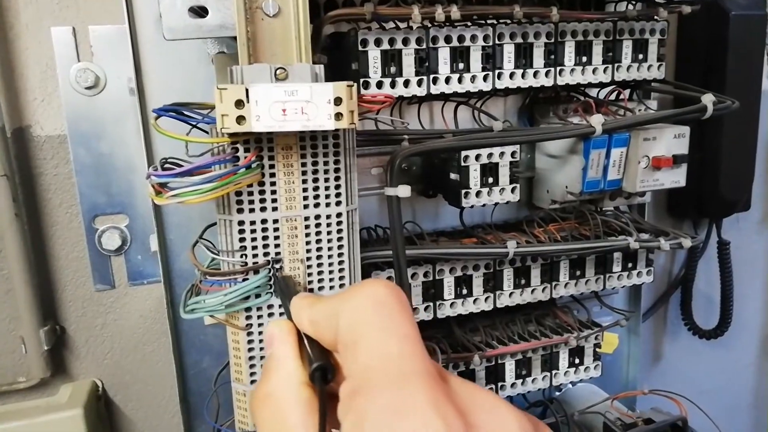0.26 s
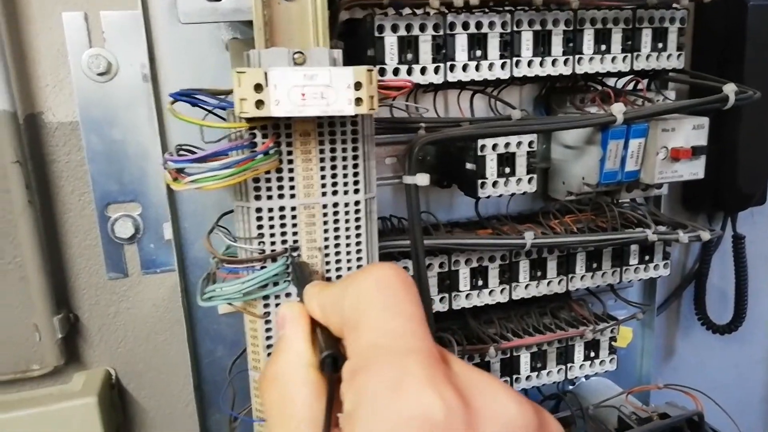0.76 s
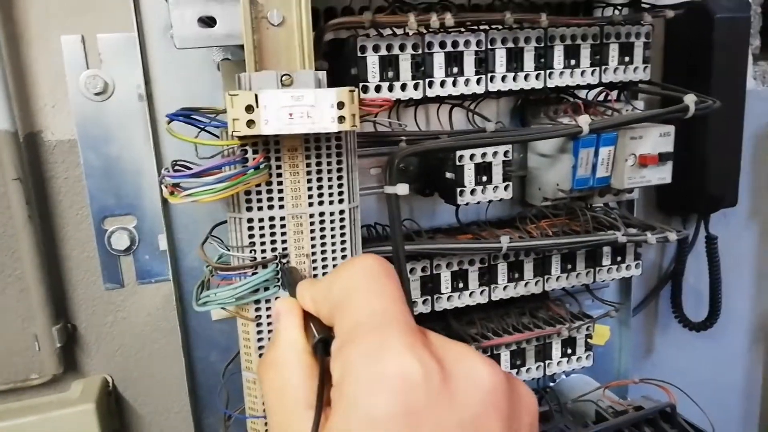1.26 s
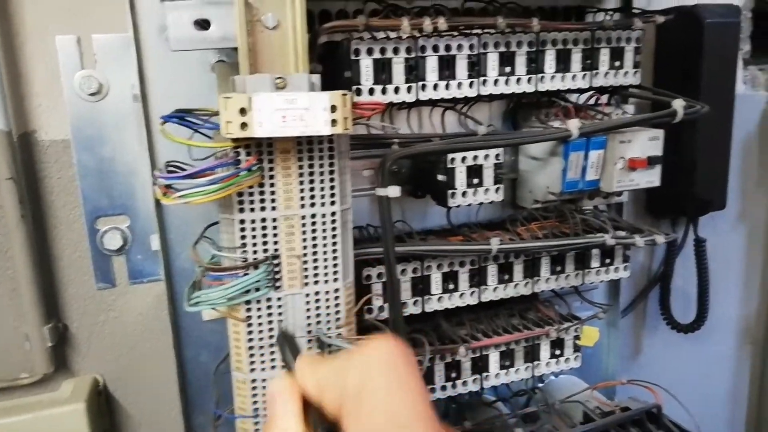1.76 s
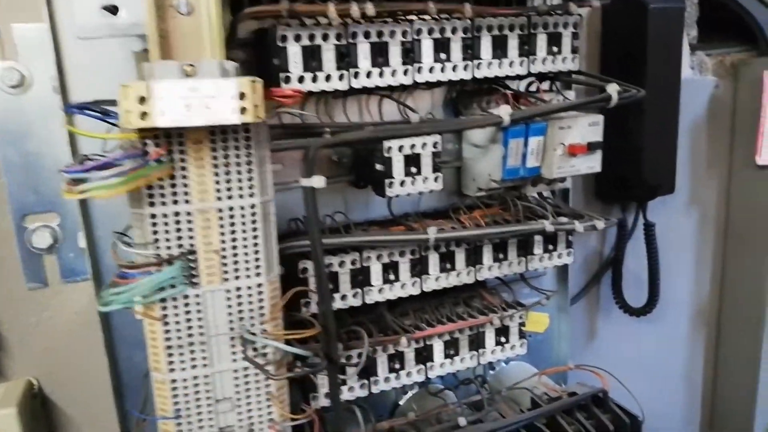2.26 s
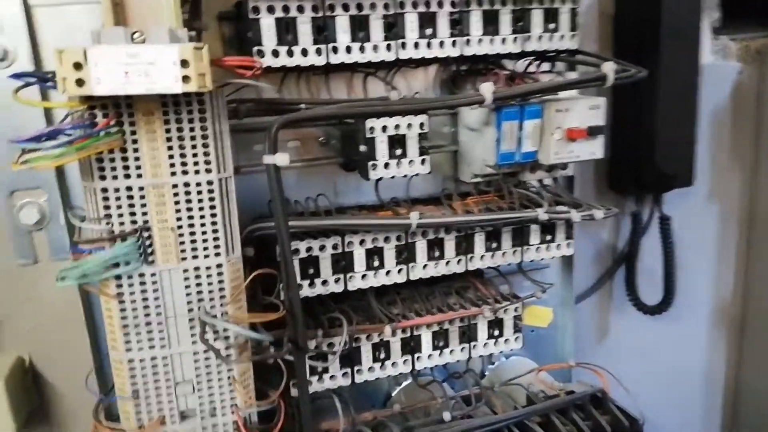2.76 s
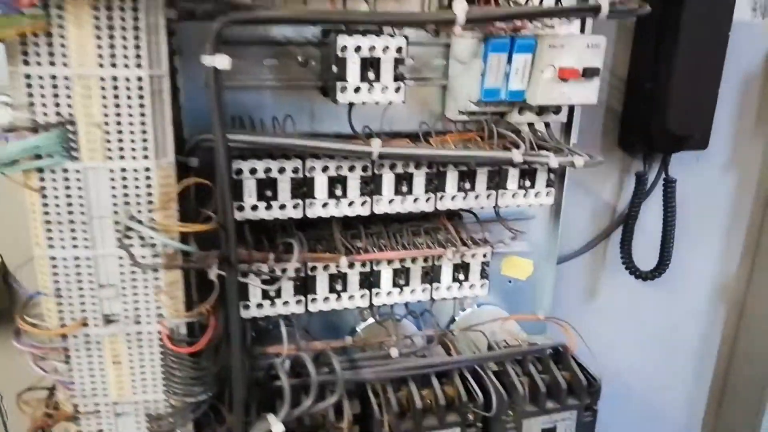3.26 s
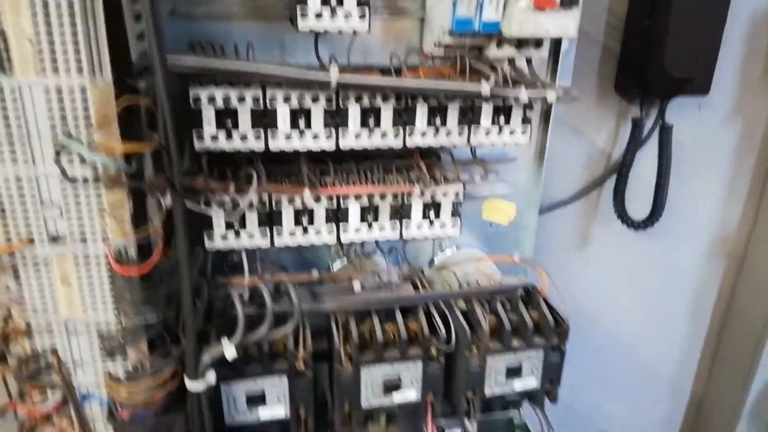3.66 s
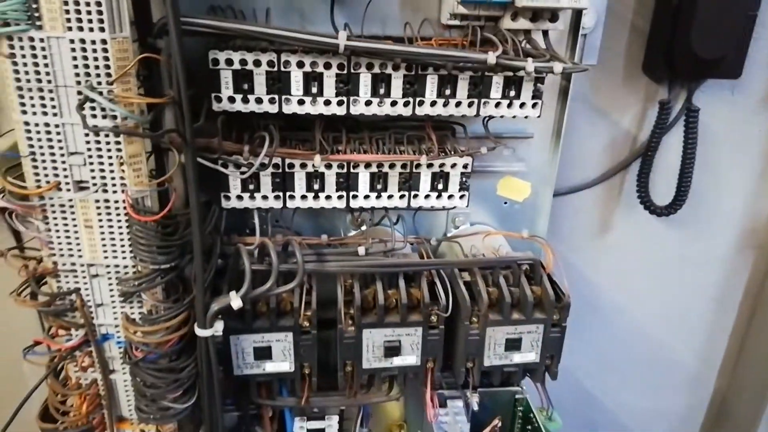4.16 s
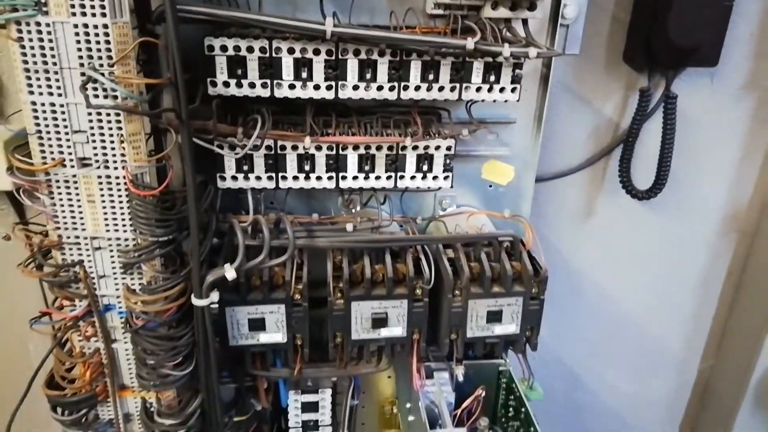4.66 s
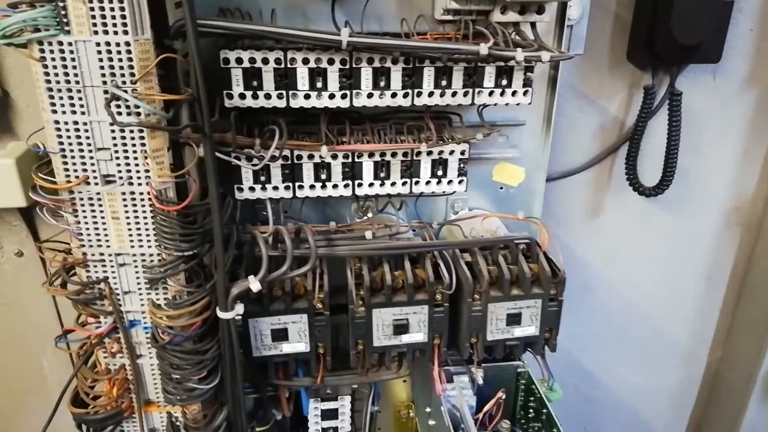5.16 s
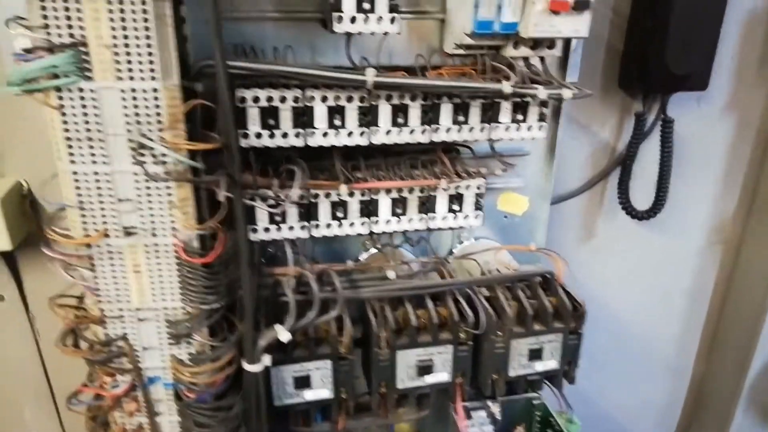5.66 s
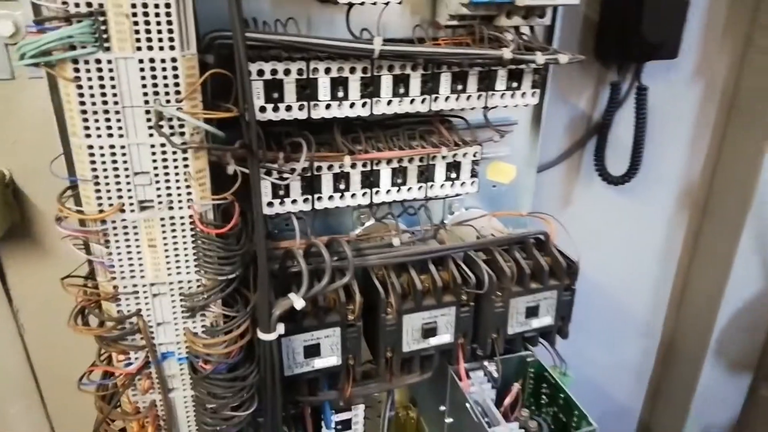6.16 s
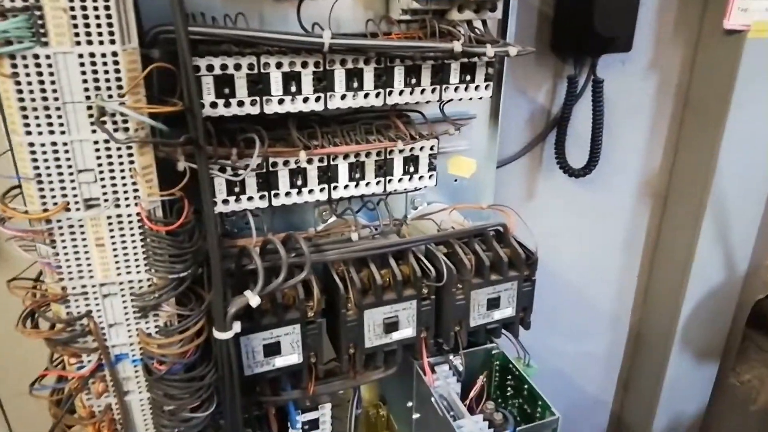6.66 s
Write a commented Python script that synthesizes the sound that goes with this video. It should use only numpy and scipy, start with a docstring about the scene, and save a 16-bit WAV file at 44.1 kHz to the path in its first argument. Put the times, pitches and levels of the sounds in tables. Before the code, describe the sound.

A bare, reflective machine room, heard in stereo close to a relay cabinet. The first 0.9 seconds hold only faint low room noise, with a tiny tick at 0.54. At 0.93-0.99 a loud, bright contactor snap bursts as rapid metallic chatter with a short echo. Immediately a pump motor starts: a low hum near 100 hertz, swelling and sagging, with a shaking rumble and rushing oil. At 1.49-1.71 a second, softer but more boxy series of clacks thuds through the cabinet; the flow surges and turns resonant. From about 1.6 a breathy, hollow valve tone with overtones glides downward, falling fastest around 3.2 and strongest near 4, then low and fading. Hiss and fizzy oil continue; the brightest fizz eases by 6. Thin wavering pump whines persist, and a pipe singing near 1.6 kilohertz slowly grows after 4.5. A single sharp relay click lands at 5.3; hum and hiss run to the end, near 7.

```python
"""A contactor snaps shut in the control cabinet of a hydraulic elevator and the pump motor starts.
The motor hums at twice the mains frequency; a second contactor clacks over to full power.
Oil hisses through a closing valve, whose breathy tone sinks through the resonances of pipe and tank.
The blows are decaying noise with cabinet modes; hum and pump are wavering sines; the oil is shaped
noise; the valve tone is a blurred series of overtones. Reflections from bare walls join them."""
import sys
import numpy as np
from scipy import signal
from scipy.fft import rfft, irfft
from scipy.io import wavfile
from scipy.ndimage import uniform_filter1d

SR = 44100
rng = np.random.default_rng(int(sys.argv[2]) if len(sys.argv) > 2 else 0)


def generate_wav(signal):
    """Clip the signal to [-1, 1] and save it as 16-bit WAV at the path in sys.argv[1]."""
    frames = np.transpose(np.atleast_2d(signal))
    scaled = np.clip(frames, -1, 1) * 32767
    pcm = np.round(scaled).astype(np.int16)
    wavfile.write(sys.argv[1], SR, pcm)


N = 305613
TIME = np.arange(N) / SR  # s
BINS = np.fft.rfftfreq(1024, 1 / SR)  # Hz, of the short-time spectra
FRAMES = np.arange(N // 256 + 5) * 256 / SR  # s, of the short-time spectra
START = 0.98  # s, the motor and the oil set in


def amp(db):
    """Level: decibels become a gain."""
    return 10 ** (np.asarray(db) / 20)


def unit(x):
    """Normalisation: scales to rms 1."""
    return x / np.sqrt(np.mean(x ** 2) + 1e-20)


def read(points, hz):
    """Interpolation: reads a spectrum on a log-frequency axis."""
    f, value = np.transpose(points)
    return np.interp(np.log(hz + 1), np.log(f + 1), value)


def follow(rows, t):
    """Interpolation: the columns of a curve table at times t."""
    s, *columns = np.transpose(rows)
    return [np.interp(t, s, c) for c in columns]


def colour(x, db_at):
    """Linear filtering: applies a gain in dB given as a function of frequency."""
    size = x.shape[-1]
    hz = np.fft.rfftfreq(size, 1 / SR)
    return irfft(rfft(x) * amp(db_at(hz)), size)


def drift(hz):
    """Low-passed noise: slow random motion of rms 1, up to about hz."""
    low_pass = np.exp(-(np.fft.rfftfreq(N, 1 / SR) / hz) ** 2)
    return unit(irfft(rfft(rng.standard_normal(N)) * low_pass, N))


def running(start, rise):
    """Linear onset: fades in from start over rise seconds."""
    return np.clip((TIME - start) / rise, 0, 1)


def s_curve(t, middle, width):
    """Sigmoid: a smooth step from 0 to 1."""
    return 0.5 + 0.5 * np.tanh((t - middle) / (2 * width))


def pair(two):
    """Spatial coherence: two unrelated signals become a field at two microphones, alike in the bass."""
    # Each row: frequency in Hz, left-right correlation
    likeness = [(120, 1), (300, 0.81), (600, -0.57), (1200, 0.061), (2500, -0.12), (6000, 0.015)]
    # Each row: frequency in Hz, left minus right in dB
    balance = [(300, 0.5), (650, -4), (1200, -1), (2500, -0.5), (5000, -1), (9000, 3), (12500, -2.5)]
    hz = np.fft.rfftfreq(N, 1 / SR)
    a, b = rfft(two)
    same = np.clip(read(likeness, hz), -1, 1)
    mid = a * np.sqrt((1 + same) / 2)
    side = b * np.sqrt((1 - same) / 2)
    lean = amp(read(balance, hz) / 2)
    return irfft(np.array([(mid + side) * lean, (mid - side) / lean]), N)


def noise(field_db):
    """Short-time synthesis: two unrelated noises whose spectrum follows a field in dB."""
    a, b = rng.standard_normal((2, 2, len(FRAMES), len(BINS)))
    spectra = ((a + 1j * b) * amp(field_db)).swapaxes(1, 2)
    return signal.istft(spectra, nperseg=1024, noverlap=768)[1][:, :N]


def patches(frame_count, bin_count):
    """Local averaging: smooth random patches over time and frequency, for each channel."""
    z = rng.standard_normal((2, len(FRAMES), len(BINS)))
    smooth_in_time = uniform_filter1d(z, frame_count, axis=1)
    return unit(uniform_filter1d(smooth_in_time, bin_count, axis=2))


def room(x, build=0.0013):
    """Reverberation: dense reflections from bare walls, each band dying at its own speed."""
    # Each row: frequency in Hz, time to decay by 60 dB in seconds
    decay_times = [(200, 0.51), (1000, 0.82), (4000, 0.57), (10000, 0.49), (15000, 0.098)]
    hz, t, z = signal.stft(rng.standard_normal((2, SR)), SR, nperseg=256)
    z = z * amp(-60 * t / read(decay_times, hz)[:, None])
    z = z * (1 - np.exp(-t / build))
    tail = signal.istft(z, SR, nperseg=256)[1]
    return signal.fftconvolve(x, tail / np.linalg.norm(tail[0]), axes=1)[:, :N]


def pipe_db(hz):
    """Resonance: bell-shaped lifts and notches that pipe and tank give, in dB."""
    # Each row: centre in Hz, width in Hz, lift in dB
    resonances = [(228.8, 28, 7.5), (338, 15, 11), (570, 91, 4), (770, 17, 13), (943, 42, 15),
                  (946.6, 71, 0.5), (1000, 110, -4.5), (1380, 130, 0), (1665, 440, -4), (1975, 45, 17.5),
                  (2117, 110, 17), (2968, 33, 14.5), (3222, 20, 11), (4450, 47, 7.5), (7000, 420, 5.5),
                  (8520, 400, 0.5), (9900, 220, -2.5)]
    return sum(db / (1 + (2 * (hz - f) / width) ** 2) for f, width, db in resonances)


def opening(t):
    """Throttling: travel of the valve along an S-curve from 1, open, to 0, shut."""
    return 1 - s_curve(t, middle=3.24, width=0.6)


def machine_room(level_db=-53, patches_db=1.2):
    """Ambient noise: many faint sources add up to a diffuse, slightly patchy noise."""
    # Each row: frequency in Hz, relative spectrum level in dB
    spectrum = [(15, -46), (25, -14), (32, -11), (43, -7), (64, -5), (82, -6), (149, -17.5), (180, -17.5),
                (263, -14), (591, -29.5), (936, -22), (1040, -23), (1230, -29), (13600, -46.5),
                (16000, -51)]
    field = read(spectrum, BINS) + patches_db * patches(frame_count=14, bin_count=8)
    return amp(level_db) * unit(pair(noise(field)))


def motor(hum_trim_db=1, sway=0.072, waver_db=1):
    """Magnetostriction and forced vibration: hum at twice the mains, over the shaken tank's rumble."""
    # The hum swells and sags at the microphone.
    # Each row: time in seconds, rms level in dB ahead of the trim and waver
    hum_levels = [(1.16, -22), (1.46, -26), (1.61, -35.5), (1.83, -24.5), (2.04, -36.5), (2.19, -24.5),
                  (2.51, -28), (2.77, -24.5), (2.96, -31), (3.25, -25), (3.47, -35.5), (3.55, -29.5),
                  (4.39, -30.5), (4.45, -39), (4.62, -31.5), (4.81, -39), (4.97, -31), (6.93, -30)]
    # Each switching step jolts the tank. Each row: start in seconds, peak level in dB
    jolts = [(1.02, -36.5), (1.52, -32)]
    # Each row: frequency in Hz, relative level of the shaking in dB
    shake_colour = [(20, -23), (35, -23), (47, 1), (58, 0.5), (75, 2), (95, 5.5), (120, -7.5), (170, -12),
                    (260, -9), (500, -51)]
    mains_hz = 50.02
    attack_s, jolt_rise_s = 0.19, 0.14  # the hum builds up as the motor takes current; top of a jolt
    steady_shake_db = -40.5

    phase = 2 * np.pi * 2 * mains_hz * TIME + sway * drift(2.9)
    level = amp(follow(hum_levels, TIME)[0] + hum_trim_db + waver_db * drift(4.6))
    level = level * running(START, attack_s) ** 1.8
    hum = np.sqrt(2) * level * np.sin(phase)

    shake = amp(steady_shake_db) * running(START, 0.044)
    for s, db in jolts:
        age = np.maximum(TIME - s, 0) / jolt_rise_s
        shake = shake + amp(db) * (age * np.exp(1 - age)) ** 2
    source = rng.standard_normal((2, N))
    rumble = unit(pair(colour(source, lambda hz: read(shake_colour, hz))))
    return hum + shake * rumble


def whine(hz, wander_hz, fading=0.28):
    """Standing waves: a wavering line swells and fades at each microphone on its own."""
    phase = 2 * np.pi * np.cumsum(hz + wander_hz * drift(15.15)) / SR
    ears = [(1 + fading * drift(1.9)) * np.sin(phase + drift(0.62)) for _ in range(2)]
    return unit(np.array(ears))


def pump():
    """Periodic forcing and resonance: lines of motor and pump, and the singing pipe."""
    # Each row: frequency in Hz, level in dB at full speed ahead of the stereo spread, rms wander in Hz
    pump_lines = [(144.9, -49.5, 0.75), (221.6, -52, 1.34), (302.8, -45.5, 0.091), (367, -63, 1.7),
                  (710, -51, 0.68), (766, -47, 6.06), (891, -45, 20), (967, -42, 5.28), (1340, -49, 4.1),
                  (2170, -63, 5.8)]
    lines = sum(amp(db) * whine(hz, wander) for hz, db, wander in pump_lines)
    # the pipe starts to sing once the valve is nearly shut
    singing = amp(-37.5) * running(4.5, 1.9) * whine(1637, wander_hz=8.7, fading=0.62)
    return pair(lines + singing) * running(0.92, 1.0)


def oil(wet=0.64, ripple_db=1.54, flicker_db=0.97, level_db=-22.5, trim_db=0.06):
    """Turbulence: rush, hiss and fizz, coloured by the pipe and by slowly shifting reflections."""
    # Oil flow with the pump at speed; each level counts relative to the mean of its column.
    # Each row: time in seconds, rush in the pipe, hiss of the valve, fizz of cavitation, all in dB
    flow_levels = [(1.85, -40.5, -39.5, -34.5), (2.03, -36.5, -39.5, -31.5), (3.5, -34, -35.5, -28),
                   (3.71, -38.5, -34, -27), (4.61, -35.5, -30.5, -28.5), (5.98, -39.5, -32.5, -39),
                   (6.24, -38.5, -33, -39.5), (6.75, -41, -35, -43)]
    # For rush, hiss and fizz. Each row: change before the pump takes up the oil, surge at run-up, in dB
    run_up = [(-8, 8), (-9, 2.5), (-12, 3)]
    # Each row: frequency in Hz, relative level in dB
    flow_colour = [(70, -41), (130, -0.5), (200, -22), (330, -5), (480, -9), (700, -8), (900, -4),
                   (1120, -8.5), (1700, -6.5), (2600, -6.5), (5000, -6), (10300, -3), (13000, -14),
                   (16000, -22)]
    ring_open, ring_shut = 0.93, 0.34  # share of the resonance lift: an open valve rings the pipe most

    levels = np.array(follow(flow_levels, FRAMES))
    relative = levels - levels.mean(axis=1, keepdims=True)
    unprimed = 1 - s_curve(FRAMES, middle=1.25, width=0.013)
    surge = np.exp(-((FRAMES - 1.46) / 0.16) ** 2)
    rush, hiss, fizz = relative + np.array(run_up) @ [unprimed, surge]

    # the resonances build up with the pressure
    ringing = ring_shut + (ring_open - ring_shut) * opening(FRAMES)
    ringing = ringing * s_curve(FRAMES, middle=1.52, width=0.13)

    # the rush fills the middle, the hiss lies above it, the fizz at the top
    above_rush = read([(950, 0.066), (1500, 1)], BINS)
    top = read([(4800, 0.053), (10000, 0.96)], BINS)
    field = np.outer(rush, 1 - above_rush) + np.outer(hiss, above_rush - top) + np.outer(fizz, top)
    field = field * read([(300, 0.18), (700, 0.99)], BINS)  # the bass follows the flow less
    field = field + read(flow_colour, BINS) + np.outer(ringing, pipe_db(BINS))
    field = field + ripple_db * patches(frame_count=170, bin_count=2)
    field = field + flicker_db * patches(frame_count=8, bin_count=30)

    # part of the flow is heard directly, part by way of the walls
    wet = np.clip(wet, 0, 1)
    direct, reflected = (noise(field) * running(START, 0.055) for _ in range(2))
    flow = pair(np.sqrt(1 - wet) * direct + np.sqrt(wet) * room(reflected))
    return amp(level_db + trim_db) * flow / flow[:, TIME > 2].std()


def valve(blur_hz=34, spread=0.17):
    """Vortex shedding: eddies make a breathy tone; each overtone flares as it crosses a resonance."""
    # Each row: time in seconds, level in dB ahead of the resonances and the room
    tone_levels = [(1.58, -62), (1.76, -49.5), (2.15, -50), (2.65, -51), (3.3, -44), (3.92, -37.5),
                   (4.35, -45), (5.8, -46.5), (6.9, -64)]
    # Each row: multiple of the pitch, relative level in dB
    overtones = [(1, -0.5), (2, -1), (3, -1), (4, -4), (5, -22), (6, -4)]
    open_hz, shut_hz = 746.8, 200.4  # pitch at the two ends of the travel, ahead of the hunting
    open_db, shut_db = 10.5, -13  # lift of the overtones: the tone gets purer as the gap narrows
    hunting, hunting_hz = 0.02, 8.96  # rms share by which the pitch wanders, and how fast

    gap = opening(TIME)
    db = follow(tone_levels, TIME)[0]
    hz = (shut_hz + (open_hz - shut_hz) * gap) * (1 + hunting * drift(hunting_hz))
    phase = 2 * np.pi * np.cumsum(hz) / SR
    overtones_db = shut_db + (open_db - shut_db) * gap
    tone = np.zeros((2, N))
    for k, k_db in overtones:
        width = blur_hz * k ** spread
        # random amplitude and phase spread the line into a narrow band of noise
        blur = np.array([drift(width) + 1j * drift(width) for _ in range(2)])
        level = amp(db + k_db + overtones_db * (round(k) > 1))
        tone += level * (blur * np.exp(1j * round(k) * phase)).real
    return pair(room(colour(tone, pipe_db) * running(1.4, 0.26)))


def contactors():
    """Impact and modal decay: a brief chatter of contacts and a thud that rings the cabinet."""
    # Contactor and relay blows. Each row: start in seconds, level in dB,
    # decay of the chatter by 60 dB in seconds, weight of the cabinet thud in dB
    blows = [(.5395, -37, .012, -10.5), (.9314, -7.5, .02, -27), (.9378, -5.5, .028, -17),
             (.9705, -11, 0.024, -36), (0.9866, -7, 0.017, -42), (0.99, -10, 0.0095, -38),
             (1.485, -13, 0.021, -25), (1.4945, -14, 0.031, 1), (1.5083, -25.5, 0.043, 8.5),
             (1.5305, -13.5, 0.029, -14), (1.5434, -15, 0.019, -12), (1.6352, -16.5, 0.035, -10),
             (1.6924, -19, 0.046, -14), (1.7058, -19, 0.011, -3), (5.303, -14, 0.029, -22)]
    # Ring of the contacts. Each row: frequency in Hz, relative level in dB
    contact_colour = [(300, -26), (900, -25), (2500, -14), (5000, -13), (7500, -9.5), (9000, -4),
                      (10400, -0.5), (12000, -8), (14000, -21), (16000, -32)]
    # Modes of the cabinet. Each row: frequency in Hz, relative level in dB, 60 dB decay time in seconds
    cabinet = [(795, -4, 0.04), (886, -3.5, 0.072), (1118, -16, 0.028), (1393, 1, 0.024), (1710, -5, 0.024),
               (2100, -25, 0.031), (2970, 4, 0.01)]

    t = np.arange(SR // 4) / SR
    out = np.zeros((2, N))
    for s, db, decay, thud_db in blows:
        source = rng.standard_normal((2, len(t)))
        chatter = unit(colour(source, lambda hz: read(contact_colour, hz))) * amp(-60 * t / decay)
        phases = 2 * np.pi * rng.random((len(cabinet), 2, 1))
        thud = sum(amp(d - 60 * t / t60) * np.sin(2 * np.pi * f * t + p)
                   for (f, d, t60), p in zip(cabinet, phases))
        onset = 1 - np.exp(-t / 0.00033)
        blow = amp(db) * (chatter + amp(thud_db) * thud) * onset
        part = out[:, round(s * SR):][:, :len(t)]
        part += blow[:, :part.shape[1]]
    return out


def scene():
    """Superposition: the cabinet close by, the pump unit behind it, the quiet of the machine room."""
    clicks = contactors()
    echoes = amp(-1.5) * room(clicks)
    return clicks + echoes + motor() + pump() + oil() + valve() + machine_room()


def record(dry):
    """Band limiting: a full-scale limit, then a low-pass at 15.9 kHz."""
    low_pass = signal.firwin(511, 15900, window=("kaiser", 9), fs=SR)
    return signal.oaconvolve(np.clip(dry, -1, 1), low_pass[None], "same")


dry = scene()
out = record(dry)
generate_wav(out)
```